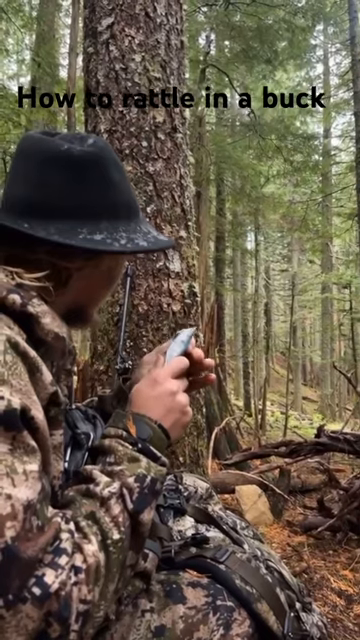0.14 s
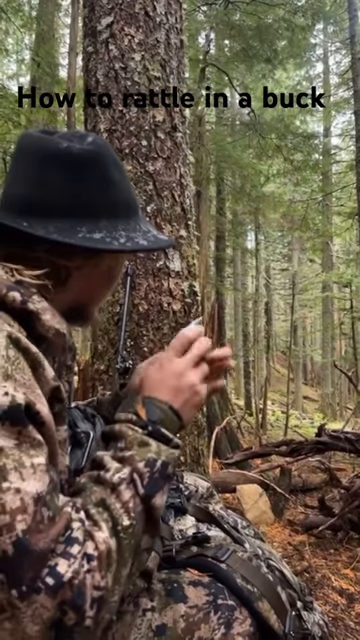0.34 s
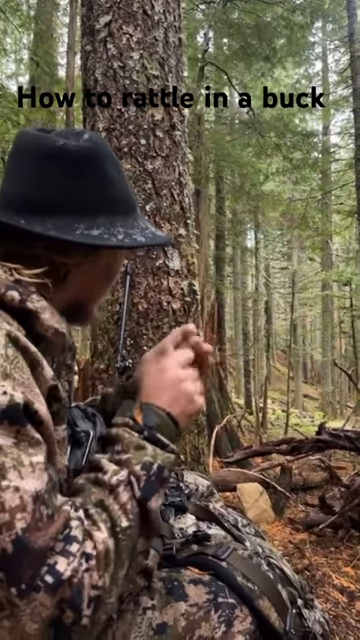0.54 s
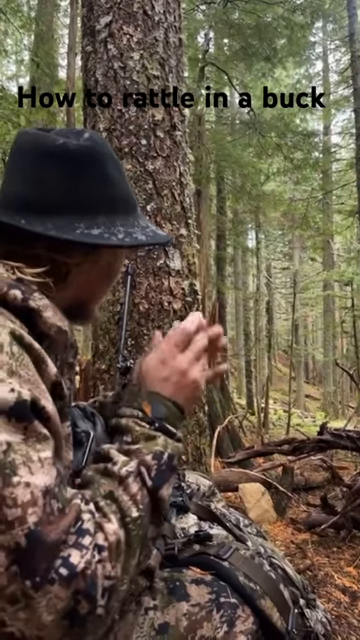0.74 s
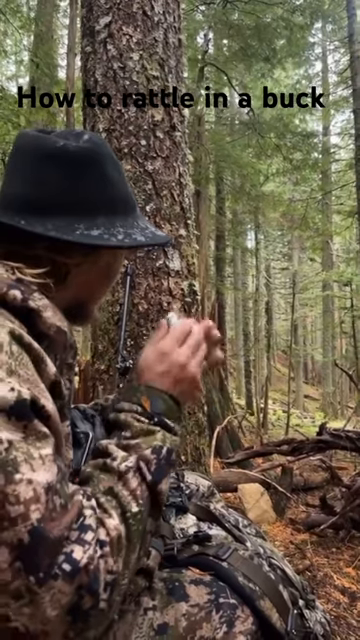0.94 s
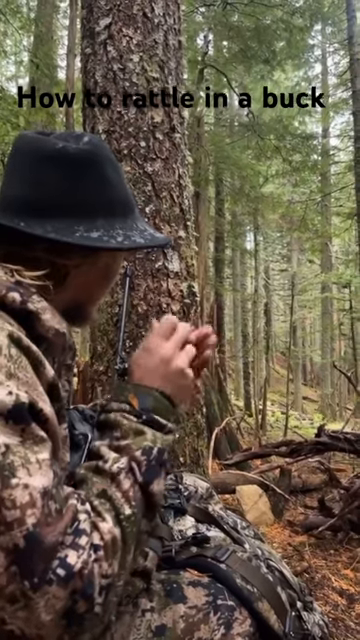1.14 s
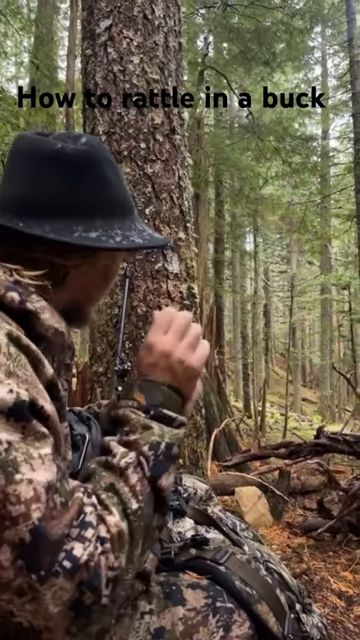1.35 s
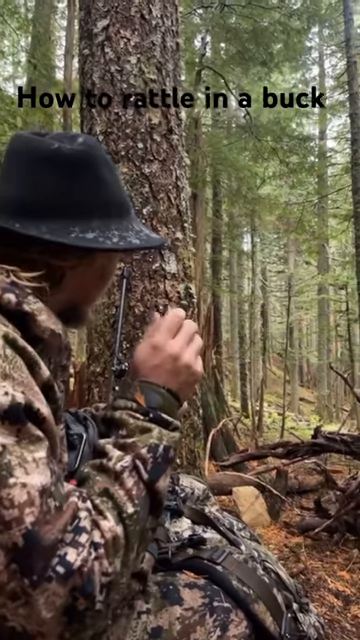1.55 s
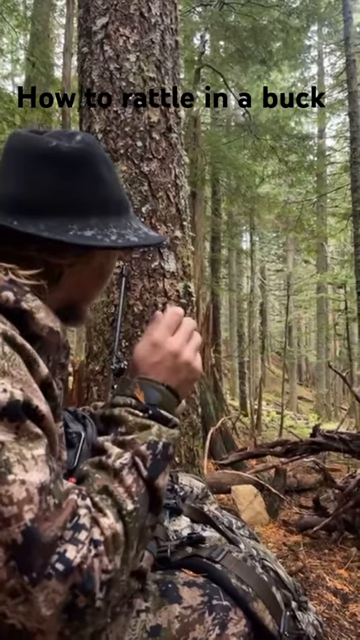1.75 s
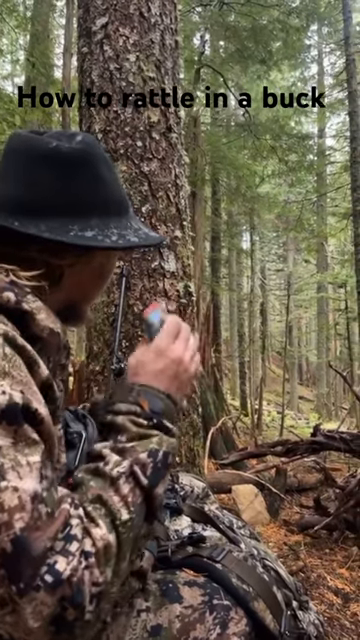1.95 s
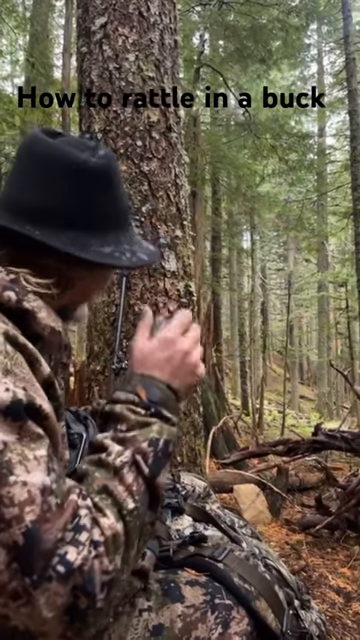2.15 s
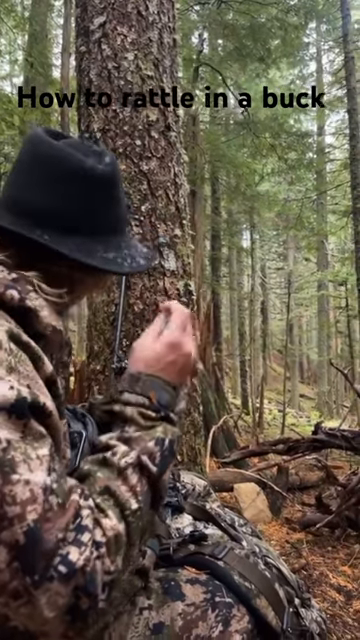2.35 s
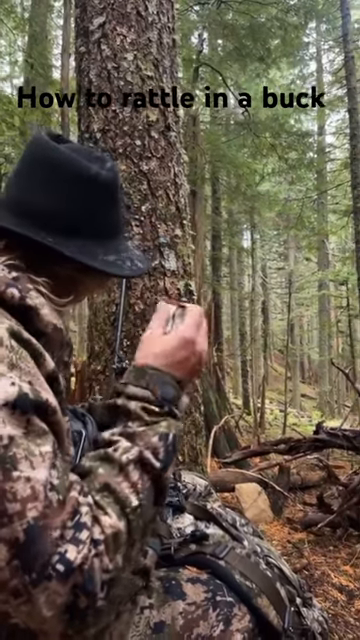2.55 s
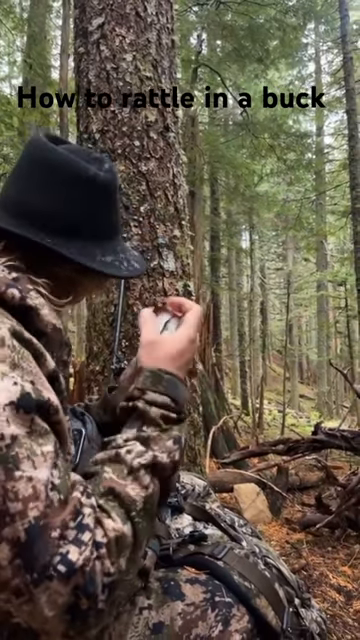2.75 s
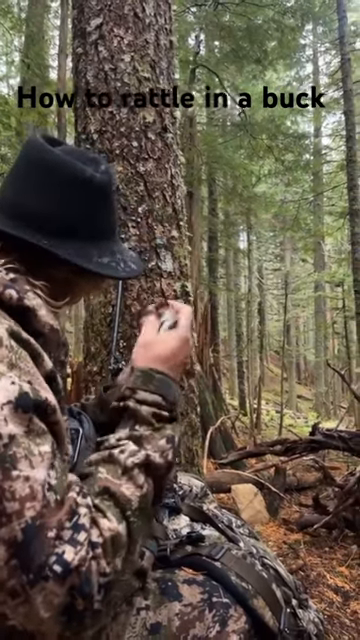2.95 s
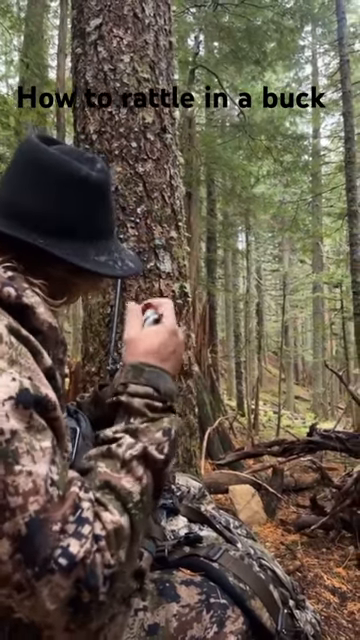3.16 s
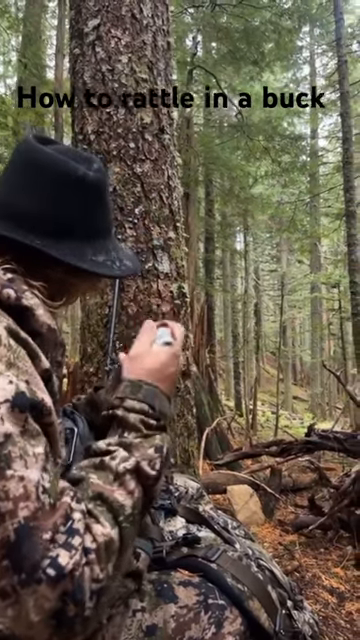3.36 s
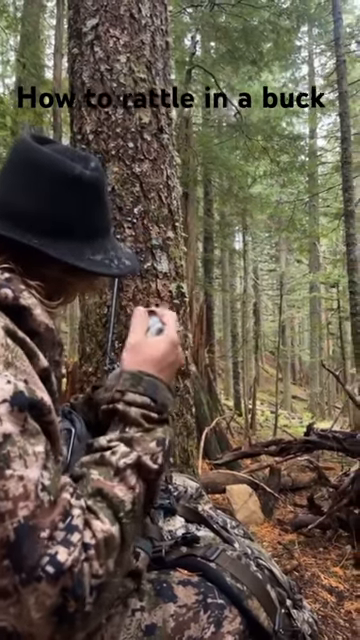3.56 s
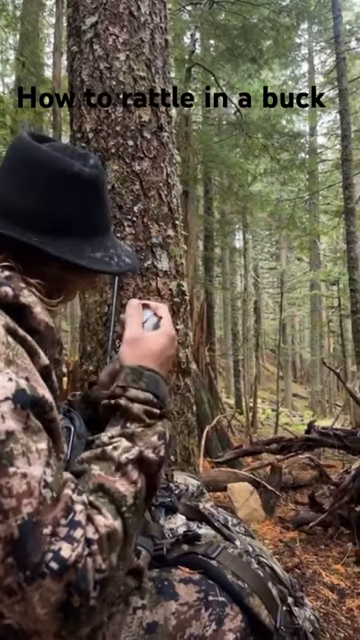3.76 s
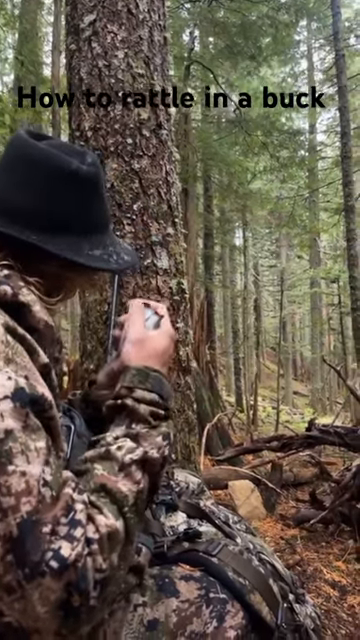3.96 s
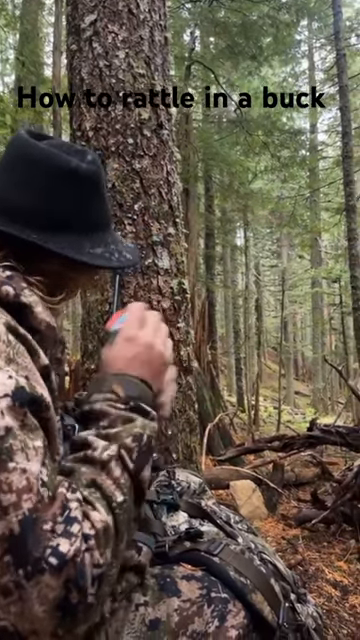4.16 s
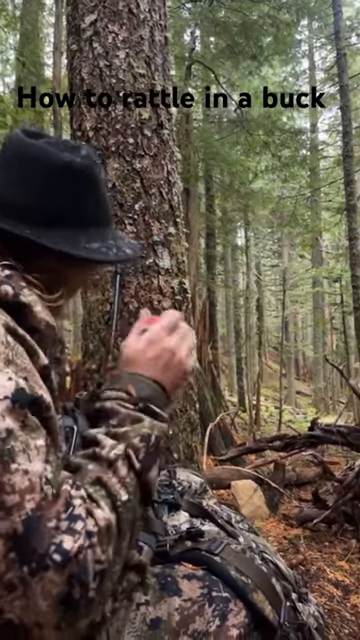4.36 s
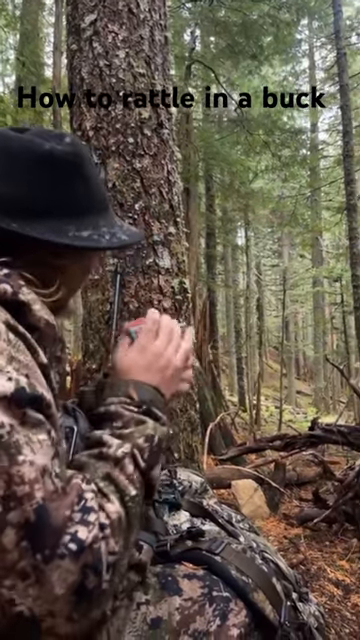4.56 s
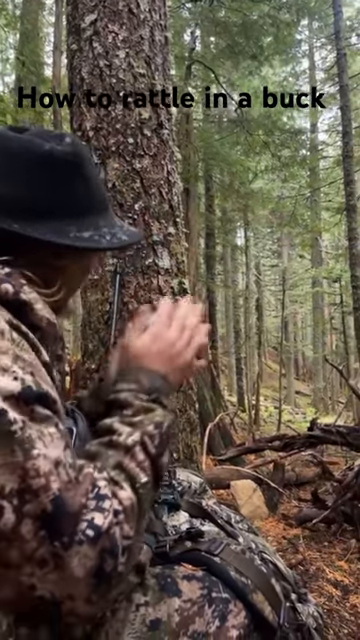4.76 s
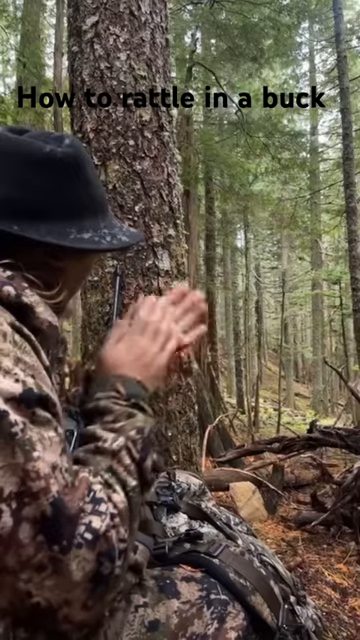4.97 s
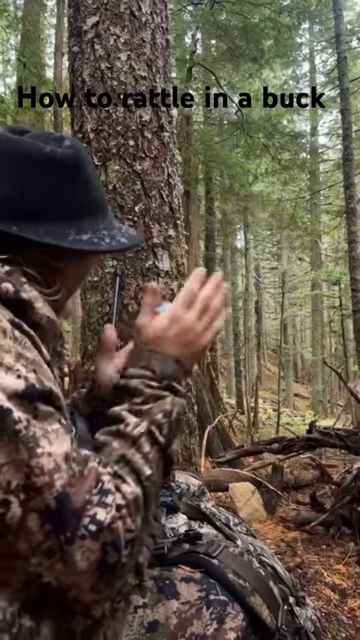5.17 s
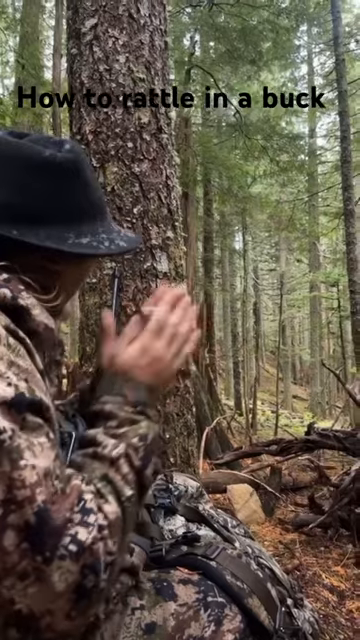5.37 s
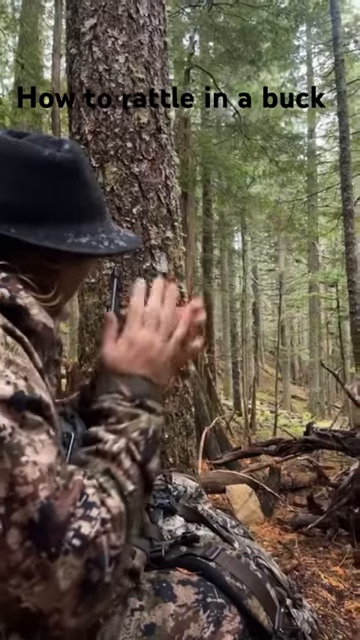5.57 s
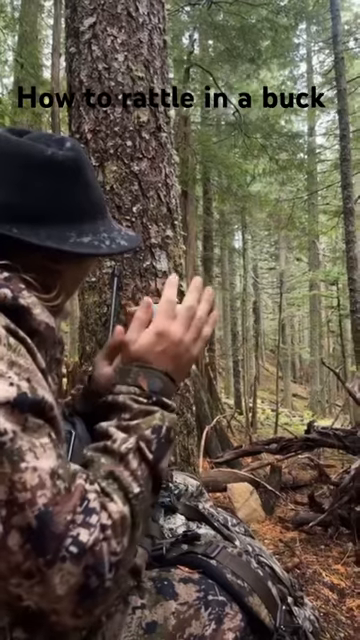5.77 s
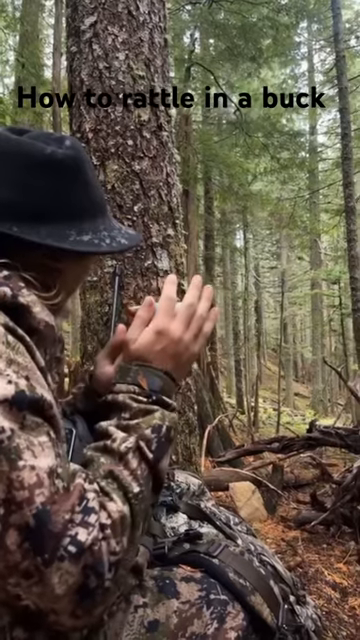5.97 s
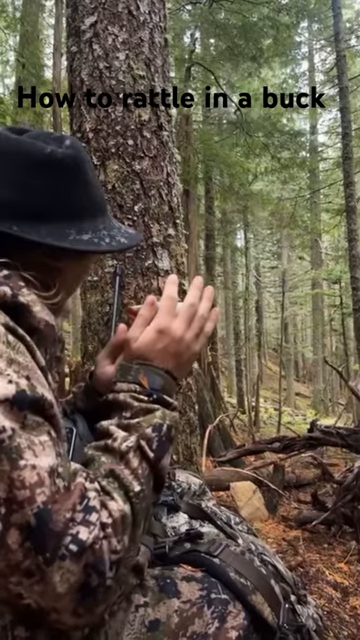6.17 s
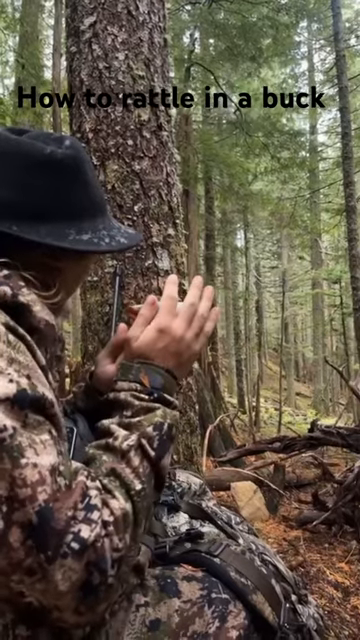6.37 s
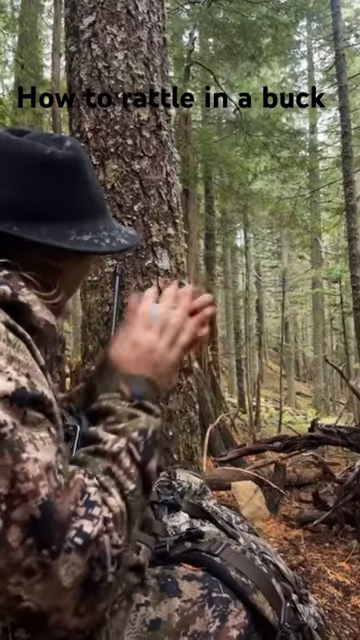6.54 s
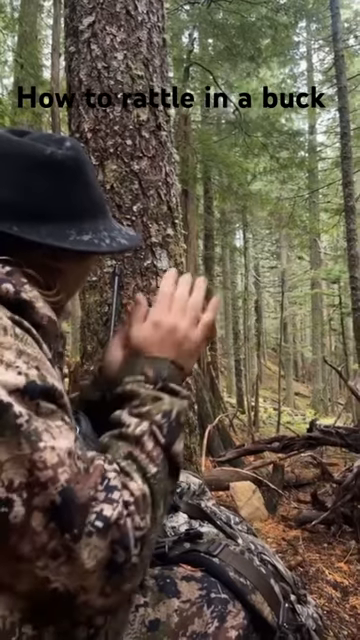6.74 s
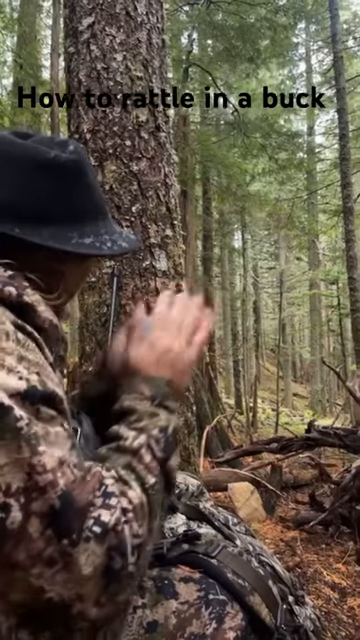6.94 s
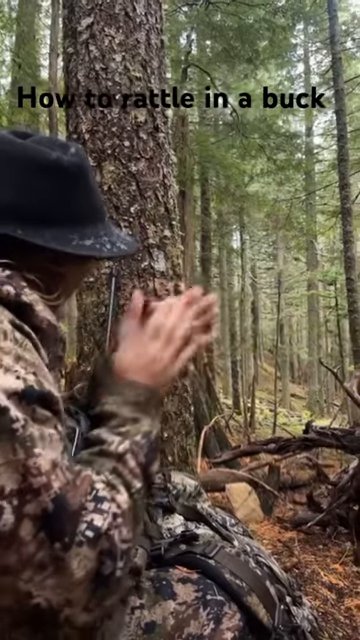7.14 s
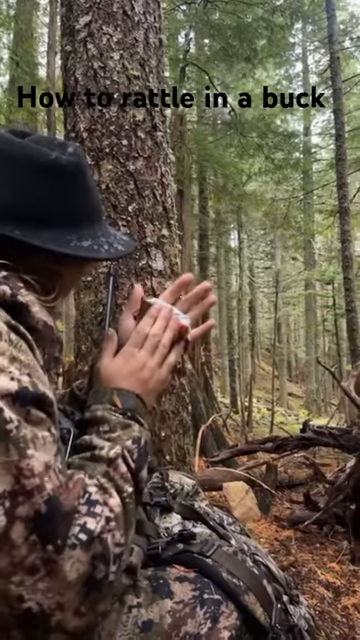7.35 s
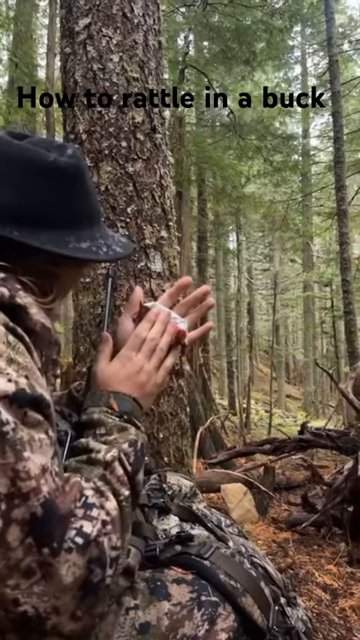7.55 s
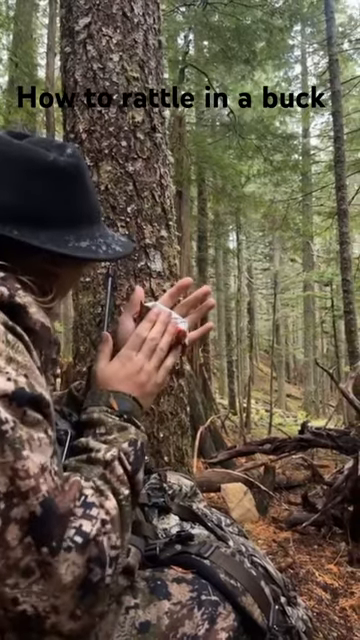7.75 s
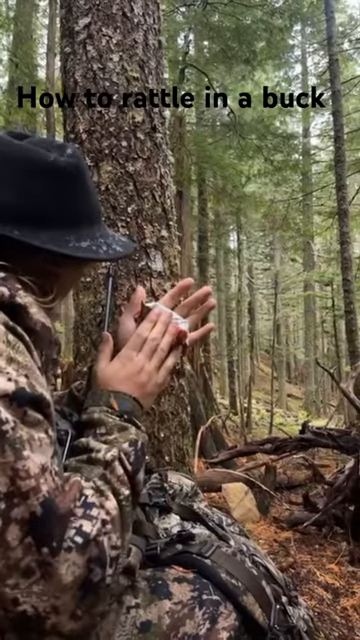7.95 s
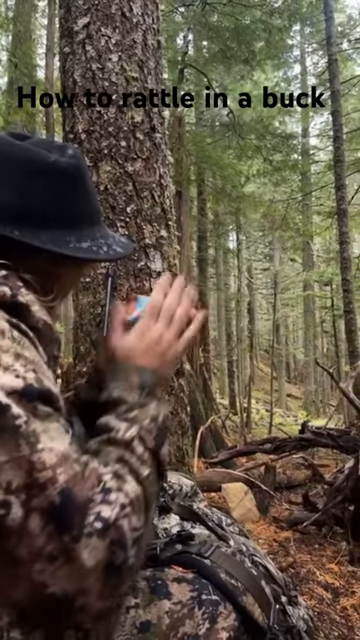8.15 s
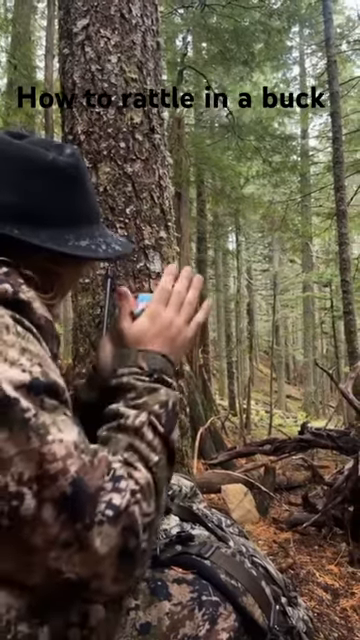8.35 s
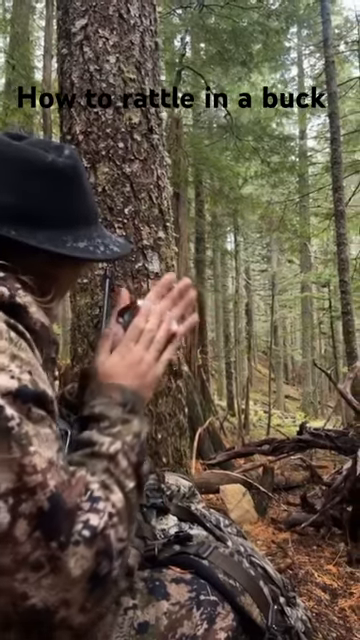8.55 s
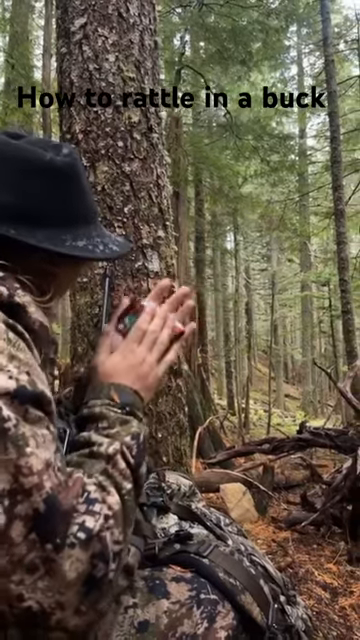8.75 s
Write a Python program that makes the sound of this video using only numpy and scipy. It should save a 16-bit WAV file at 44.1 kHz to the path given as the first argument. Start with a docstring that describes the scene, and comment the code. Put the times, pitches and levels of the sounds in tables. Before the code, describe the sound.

Very close to a phone in a quiet forest, a bundle of hard antler-like sticks is rolled between palms. Dense gritty grinding swells and fades in quick strokes, peppered with dry, sharp clacks and occasional hollow palm knocks and soft low thumps. It thins to ticks, resumes, pauses around four and six seconds, then returns harder. After a lull near seven and a half seconds, a few last strokes. Every ring is damped; almost no echo.

```python
"""Rolling sticks in a forest

A bundle of hard, antler-like sticks is rolled between two palms in a quiet forest, close to a phone.
Dense tiny contacts make the grinding strokes, single contacts the dry clacks; the hands damp every ring.
In the pauses the bundle shifts with faint ticks; it also knocks on the palms with a hollow sound.
Soft thumps are low tones falling in pitch; shaped noise makes the forest hush,
and decaying noise makes the faint scatter that the trunks return."""
import sys
import numpy as np
from scipy import signal
from scipy.fft import rfft, irfft
from scipy.io import wavfile
from scipy.ndimage import uniform_filter1d

SR = 44100
rng = np.random.default_rng(int(sys.argv[2]) if len(sys.argv) > 2 else 0)


def dump_mix(stems):
    """Bounce the given channels to the path in sys.argv[1] as a 16-bit WAV at rate SR."""
    frames = np.atleast_2d(stems).T  # one column per channel
    limited = np.clip(frames, -1, 1)  # hard clip at full scale
    pcm = np.round(limited * 32767).astype(np.int16)
    wavfile.write(sys.argv[1], SR, pcm)


N = 388521
T = np.arange(N) / SR  # time in seconds

# The forest hush, the shape of its spectrum.
# Each row: frequency in Hz, relative level per Hz in dB.
HUSH_SPECTRUM = [(15, -32), (25, -9.5), (53, 2.5), (117, -6), (317, -12.5), (754, -17), (6920, -30.5),
                 (16000, -47)]
HUSH_DB = -61  # average level of the whole hush

# Resonances of the hand-held sticks, before each contact varies them.
# Each row: frequency in Hz, width in Hz, relative height in dB.
STICK_MODES = [(1094, 430, -2), (1724, 200, 0.5), (1640, 380, -1.5), (2700, 790, -5.5), (2852, 560, 3.5),
               (4750, 1200, -6.5), (5380, 780, -6.5), (6983, 260, 3.5), (7560, 450, -4), (8670, 770, -9),
               (15200, 1700, -15)]
# Resonances of the hollow of the cupped hands, before each contact varies them.
# Each row: frequency in Hz, width in Hz, relative height in dB.
HAND_MODES = [(157.7, 53, -24.5), (366, 63, -11), (487, 92, -6.5), (809, 330, -9)]

# Faint ticks as the resting bundle shifts in the grip.
# Each row: start in seconds, level averaged over 3 ms in dB.
SHIFT_TICKS = [(0.0424, -45.5), (0.083, -46), (0.094, -43), (1.5769, -47), (1.761, -52), (1.809, -40),
               (1.818, -47), (3.984, -54), (5.8612, -57), (5.9213, -54.5), (5.9773, -52.5), (6.017, -51),
               (6.1485, -57), (7.431, -49), (8.266, -44.5)]
CONTACT_GAIN = np.sqrt(.003 * SR)  # turns an energy of one into a level of 0 dB over 3 ms
CONTACT_HOLLOW_DB = -21.5  # hands' hollow against the mids in a single contact

# Low thumps that fall in pitch.
# Each row: start in seconds, peak level in dB before the shared trim in thumps(), starting pitch in Hz.
THUMP_FALLS = [(0.049, -35.5, 473), (0.125, -37.5, 410), (0.291, -44, 260), (0.633, -41, 247),
               (0.666, -35.5, 413), (0.941, -40, 270), (1.024, -39, 236), (1.208, -41, 209.5),
               (1.355, -42, 219), (1.418, -37.5, 340), (1.505, -41, 232), (1.553, -47, 172),
               (1.625, -38.5, 315), (3.019, -31.5, 215), (3.318, -41, 271), (5.144, -40, 295),
               (7.26, -28, 302), (7.467, -47, 221), (7.592, -34, 369), (8.511, -24.5, 335)]

# Spells of gentle rolling under the strokes.
# Each row: start in seconds, end in seconds, effort at the start in dB, effort at the end in dB.
ROLLING_SPELLS = [(0.08, 0.177, -52, -40.5), (0.181, 1.138, -36.5, -38), (1.148, 1.52, -33, -40),
                  (1.558, 1.787, -51, -59), (1.84, 2.892, -36.5, -34.5), (2.935, 3.31, -37, -45.5),
                  (3.419, 3.631, -39, -44.5), (3.673, 3.943, -56, -65), (4.056, 5.113, -37.5, -41),
                  (5.187, 5.74, -36.5, -43), (6.452, 7.002, -40.5, -41.5), (7.064, 7.337, -50, -43),
                  (8.054, 8.239, -45, -45), (8.454, 8.675, -38, -38.5)]
GRIP_S, RELEASE_S = 0.0055, 0.02  # time constants as the palms take hold and let go
SETTLE_DB, SETTLE_S = -22, 0.13  # the loosened bundle goes on shifting: relative level, time constant
# lull as the hands turn round: depth, half length, delay after a stroke's peak in its fade times
TURN_DB, TURN_S, TURN_AFTER = -4, 0.019, 1.5

# Strokes of the palms.
# Each row: hardest moment in seconds, effort there in dB, swell in seconds, fade in seconds.
PALM_STROKES = [(0.215, -32, 0.063, 0.063), (0.362, -29.5, 0.045, 0.07), (0.432, -25, 0.027, 0.059),
                (0.592, -22.5, 0.083, 0.037), (0.741, -27, 0.02, 0.098), (0.827, -33, 0.034, 0.05),
                (0.99, -27, 0.12, 0.029), (1.127, -23.5, 0.078, 0.023), (1.904, -28, 0.067, 0.099),
                (1.986, -23.5, 0.012, 0.0079), (2.044, -27.5, 0.021, 0.0072), (2.105, -28.5, 0.024, 0.018),
                (2.253, -36, 0.18, 0.033), (2.439, -32.5, 0.026, 0.047), (2.61, -31, 0.097, 0.025),
                (2.764, -30.5, 0.03, 0.054), (3.193, -34.5, 0.15, 0.033), (3.339, -35.5, 0.027, 0.051),
                (3.518, -29.5, 0.044, 0.028), (4.573, -26, 0.067, 0.086), (4.698, -30.5, 0.042, 0.14),
                (4.857, -23.5, 0.044, 0.06), (5.009, -24, 0.04, 0.11), (5.37, -26.5, 0.084, 0.058),
                (5.549, -21.5, 0.071, 0.042), (6.56, -20.5, 0.059, 0.053), (6.697, -23, 0.07, 0.044),
                (6.825, -22, 0.044, 0.048), (6.934, -19, 0.035, 0.049), (7.123, -20.5, 0.051, 0.075),
                (7.268, -33, 0.025, 0.056), (8.104, -22, 0.029, 0.069), (8.523, -20.5, 0.053, 0.043),
                (8.789, -25.5, 0.052, 0.048)]
STROKE_DROP_DB, STROKE_CURVE = 12.5, 1.6  # fall after one swell or fade time; roundness of the arch

# Brightness of the grinding; only its rise and fall around the average matters.
# Each row: time in seconds, treble over mids in dB.
GRIND_BRIGHTNESS = [(0.2, -3.5), (0.6, 1), (1.5, -8.5), (1.9, -4), (2.3, -6.5), (4.1, -5), (4.55, -10),
                    (4.8, -4.5), (5.05, -4.5), (6.6, -3.5), (8.8, -2.5)]
SPOT_COUNT, TOUCHING_COUNT = 110, 60  # spots on the sticks, and how many can touch at a time
SPOTS_PER_S = 150  # how fast rolling brings new spots

# Single clacks of stick against stick.
# Each row: start in seconds, level over 3 ms in dB, treble over mids in dB, pitch in Hz.
STICK_CLACKS = [(0.155, -27.5, 7, 2827), (0.18, -25, 1, 2880), (0.1934, -20, -8, 3260),
                (0.2092, -20.5, 8.5, 2290), (0.2528, -25.5, 7.5, 1700), (0.282, -25.5, -10, 2600),
                (0.4186, -15.5, -4, 1750), (0.4244, -17.5, 4.5, 2056), (0.501, -24, -18, 2690),
                (0.6179, -20.5, 3.5, 2080), (0.6478, -27.5, -1, 1700), (0.714, -28, 3.5, 1700),
                (0.7386, -19.5, -8, 2990), (0.8021, -24, -21.5, 1800), (0.8296, -14.5, 5, 2130),
                (0.8662, -19, 7, 1910), (0.985, -15.5, 12, 2300), (0.995, -22.5, 10, 2520),
                (1.1974, -26.5, -1, 1910), (1.236, -25, -5, 2320), (1.2909, -25, -15, 1976),
                (1.436, -35, 12, 2500), (1.4785, -37, 10, 2800), (1.6403, -34, 1, 3130),
                (1.6512, -31, 0, 1680), (1.693, -39.5, 8, 2400), (1.841, -31.5, 7.5, 2820),
                (1.8762, -26, -8, 2780), (1.898, -20, 0, 1820), (1.9752, -22, -12, 2500),
                (2.095, -25, 1, 2800), (2.1428, -26.5, -11, 2170), (2.2512, -29.5, -4, 2700),
                (2.477, -22, -4.5, 3460), (2.6002, -19.5, -9, 2900), (2.886, -23.5, 10, 3250),
                (2.9, -25, 10, 3110), (2.974, -26, 0.5, 2000), (3.0298, -27, 12.5, 2780),
                (3.0426, -22.5, -2.5, 2930), (3.148, -32, 13, 2030), (3.202, -25, -5, 2500),
                (3.2209, -28, 0, 2800), (3.2434, -25.5, -3, 2430), (3.3307, -26.5, -22, 1670),
                (3.353, -32.5, 1, 1700), (3.4114, -33.5, 1, 2620), (3.5135, -26, -30, 1690),
                (3.572, -28, -5, 2900), (3.5935, -24.5, -22, 2500), (3.6204, -19.5, -13.5, 2870),
                (3.676, -33.5, 10, 2200), (3.718, -39, 1, 3000), (3.796, -29.5, -15, 2580),
                (3.8096, -30, -6.5, 2000), (3.829, -40.5, 12, 3500), (3.8717, -37.5, -19, 2520),
                (4.0217, -34.5, -6, 2000), (4.0294, -25, 0, 2920), (4.0375, -24.5, -7.5, 2880),
                (4.2396, -26, -6.5, 1580), (4.3775, -25, -23, 1820), (4.4297, -31.5, -24, 1520),
                (4.591, -17.5, -22.5, 1720), (4.6868, -21.5, 10.5, 2730), (4.895, -17.5, -5, 1890),
                (4.968, -25.5, -2.5, 2940), (5.104, -18.5, -15.5, 2750), (5.1235, -30.5, -6.5, 2800),
                (5.309, -19, -3.5, 2820), (5.367, -16, -17.5, 2870), (5.3886, -16, -10.5, 2820),
                (5.578, -17.5, 8.5, 2960), (5.6485, -26.5, -3, 2520), (5.711, -22, 9, 2820),
                (5.7736, -37, 5, 2900), (5.7837, -31, -9, 1650), (6.4582, -29.5, -2.5, 2940),
                (6.483, -27, -4, 2800), (6.5865, -16.5, -13, 2900), (6.6438, -19, -6, 2480),
                (6.656, -14.5, 2, 1800), (6.7112, -18, -11, 2920), (6.8297, -14, -10, 1770),
                (7.0096, -23, 6, 2980), (7.136, -21, -10, 1900), (7.1572, -19.5, -20, 2220),
                (7.2058, -22, -3, 2000), (7.3052, -27, 6, 3000), (7.3309, -27, 3, 2190),
                (8.048, -35, -2, 3120), (8.1159, -15, -2, 2780), (8.251, -34, -4, 2860),
                (8.444, -30.5, -7, 2840), (8.511, -13.5, -28, 2800), (8.5224, -15, -19, 3000),
                (8.5456, -18.5, -17, 1950), (8.5841, -24.5, -12, 2680), (8.677, -25.5, -3.5, 2800),
                (8.6835, -30, -5, 2760), (8.7232, -38, 8.5, 2700)]

# Hollow knocks of the bundle against the palms.
# Each row: start in seconds, peak level in dB.
PALM_KNOCKS = [(0.584, -26.5), (0.986, -28), (1.302, -31.5), (1.481, -34), (1.898, -28), (2.252, -30.5),
               (4.208, -32.5), (5.023, -25.5), (6.078, -49), (8.514, -22.5)]
TOP_HZ = 15950  # upper limit of the phone


def undb(db):
    """Turn decibels into gain."""
    return 10 ** (np.asarray(db) / 20)


def curve(rows):
    """Join rows of time and value by straight lines."""
    return np.interp(T, *np.transpose(rows))


def unit(x):
    """Scale to an energy of one."""
    return x / np.sqrt(np.sum(x ** 2))


def band(x, hz, kind, order=2):
    """Cut above or below a frequency with a Butterworth filter."""
    return signal.sosfilt(signal.butter(order, hz, kind, fs=SR, output="sos"), x)


def add(out, s, x):
    """Mix x into out at time s."""
    i = max(int(s * SR), 0)
    out[i:i + len(x)] += x[:max(N - i, 0)]


def crossover(hz, edge_hz):
    """Low and high response of a steep causal crossover."""
    s = 1j * hz / edge_hz
    low = 1 / (1 + np.sqrt(2) * s + s * s) ** 2
    return low, low * (s * s) ** 2


def hush():
    """Steady low air of the forest: noise shaped to a fixed spectrum."""
    hz, db = np.transpose(HUSH_SPECTRUM)
    bins = np.maximum(np.fft.rfftfreq(N, 1 / SR), 1)
    shape = undb(np.interp(np.log(bins), np.log(hz), db))
    air = irfft(rfft(rng.standard_normal(N)) * shape, N)
    return unit(air) * np.sqrt(N) * undb(HUSH_DB)


def ring(modes, t, detune, scatter_db):
    """Damped resonances; pitch and strength depend on the spot that is touched."""
    hz, width, db = np.transpose(modes)[:, :, None]
    tune, strength, turn = rng.standard_normal((3, len(modes), 1))
    waves = np.sin(2 * np.pi * (hz * (1 + detune * tune) * t + turn))
    waves = waves * np.exp(-np.pi * width * t)  # a wide resonance dies quickly
    return np.sum(undb(db + scatter_db * strength) * width * waves, axis=0)


def contact(treble_db, hollow_db, pitch_hz, focus_db=9, focus_width=0.13, rough=0.65,
            chatter_s=0.00043, bundle=0.15, bundle_s=0.0031, press_s=0.000382,
            split_hz=3900, edge_hz=970, palm_hz=110, snap_hz=3800):
    """One stick hits another: a clean snap, a brief rough push, then a shiver through the bundle."""
    t = np.arange(1024) / SR
    size = 2 * len(t)
    hz = np.maximum(np.fft.rfftfreq(size, 1 / SR), 1)
    press = 1 - np.exp(-(t / press_s) ** 2)
    force = press * (np.exp(-t / chatter_s) + bundle * np.exp(-t / bundle_s))

    # the blunt snap rings the mids; the treble comes mostly from the rough push
    snap = np.exp(-2j * np.pi * hz * press_s) / (1 + (hz / snap_hz) ** 4)
    push = snap + rough * rfft(unit(rng.standard_normal(len(t)) * force), size)

    # thin sticks radiate little below their first mode
    under, over = crossover(hz, edge_hz)
    low, high = crossover(hz, split_hz)
    sticks = push * rfft(ring(STICK_MODES, t, detune=0.057, scatter_db=5.0), size) * over ** 2
    # the hands, ever changing shape, supply the low body
    hands = push * rfft(ring(HAND_MODES, t, detune=0.16, scatter_db=1.5), size)
    hands = hands * under * crossover(hz, palm_hz)[1]

    # the length of the struck stick decides which part of the mids speaks
    off_pitch = (hz / pitch_hz - pitch_hz / hz) / focus_width
    focus = 1 + (undb(focus_db) - 1) / (1 + 1j * off_pitch)
    spectra = (sticks * low * focus, sticks * high, hands)
    mids, treble, hollow = (unit(irfft(part)[:len(t)]) for part in spectra)
    return unit(mids + undb(treble_db) * treble + undb(hollow_db) * hollow)


def shifts(treble_db=-4, pitch_hz=2500):
    """Lone light contacts as the resting bundle shifts, with no rebound."""
    out = np.zeros(N)
    for s, db in SHIFT_TICKS:
        tick = contact(treble_db, CONTACT_HOLLOW_DB, pitch_hz)
        add(out, s, tick * undb(db) * CONTACT_GAIN)
    return out


def thumps(trim_db=-2.5, end_hz=40, fall_s=0.00964, swell_s=0.0053, decay_s=0.014,
           tail=0.094, tail_s=0.042):
    """Soft knocks whose higher part arrives first, so each falls quickly in pitch to a deep tail."""
    out = np.zeros(N)
    t = np.arange(SR // 10) / SR
    swell = 1 - np.exp(-(t / swell_s) ** 3)
    shape = swell * (np.exp(-t / decay_s) + tail * np.exp(-t / tail_s))
    shape = shape / shape.max()
    variations = rng.standard_normal((len(THUMP_FALLS), 2))
    for (s, db, start_hz), (stretch, turn) in zip(THUMP_FALLS, variations):
        fall = np.exp(-t / (fall_s * np.exp(0.039 * stretch)))
        hz = end_hz + (start_hz - end_hz) * fall
        tone = np.sin(2 * np.pi * (np.cumsum(hz) / SR + turn))
        add(out, s, tone * shape * undb(db + trim_db))
    return out


def rolling(t):
    """Power of the gentle rolling: grip, hold, release and settling, with a lull after each stroke."""
    power = np.zeros(len(t))
    for start, end, first_db, last_db in ROLLING_SPELLS:
        before, after = np.maximum(start - t, 0), np.maximum(t - end, 0)
        letting_go = np.exp(-after / RELEASE_S) + undb(SETTLE_DB) * np.exp(-after / SETTLE_S)
        hold = np.exp(-before / GRIP_S) * letting_go
        power += (hold * undb(np.interp(t, [start, end], [first_db, last_db]))) ** 2
    lull = np.zeros(len(t))
    for s, _, _, fade_s in PALM_STROKES:
        lull += np.interp(t - s - TURN_AFTER * fade_s, [-TURN_S, 0, TURN_S], [0, 1, 0])
    return power * undb(TURN_DB * lull) ** 2


def strokes(t):
    """Power of the strokes: each swells to its hardest moment and fades in a rounded arch."""
    power = np.zeros(len(t))
    for s, db, swell_s, fade_s in PALM_STROKES:
        away = np.minimum(np.maximum((s - t) / swell_s, (t - s) / fade_s), 10)
        power += undb(db - STROKE_DROP_DB * away ** STROKE_CURVE) ** 2
    return power


def effort():
    """How hard the sticks are ground together, in dB: rolling and strokes add as powers."""
    t = T[::32]  # a coarse time grid is enough
    power = strokes(t) + rolling(t) + 1e-8
    return np.interp(T, t, 10 * np.log10(power))


def slips(db, rate, spread_db, treble_db, hollow_db, rate_per_db=0.19, even_s=0.033, pitch_hz=2300):
    """Rough surfaces catch and let go in random contacts, whose number and strength follow the effort."""
    # rate is in contacts per second at the median effort; rate_per_db bends it up or down from there
    per_s = rate * np.exp(rate_per_db * (db - np.median(db)))
    hits = (rng.random(N) < per_s / SR) * undb(spread_db * rng.standard_normal(N))

    # the hands feed energy steadily: a big slip leaves less for its neighbours
    span = int(even_s * SR)
    power = uniform_filter1d(uniform_filter1d(hits ** 2, span), span // 2)
    hits = hits / np.sqrt(np.abs(power) + 1e-4) * undb(db)

    # every spot on the sticks has its own hardness, body and pitch
    spots = []
    for hard, body, size in rng.standard_normal((SPOT_COUNT, 3)):
        spot_hz = pitch_hz * np.exp(0.54 * size)
        spots.append(contact(treble_db + 6.9 * hard, hollow_db + 4.1 * body, spot_hz))

    # only some spots touch at a time, and rolling brings new ones, so the colour keeps shifting
    rolled = (SPOTS_PER_S * T).astype(int)
    spot = (rng.integers(TOUCHING_COUNT, size=N) + rolled) % SPOT_COUNT
    side = np.sign(rng.standard_normal(N))  # pushed from either side
    out = np.zeros(N)
    for i in np.flatnonzero(hits):
        add(out, T[i], side[i] * hits[i] * spots[spot[i]])
    return out


def grinding(db, split_hz=3900):
    """A fine scrape and sparser sharp slips follow the hands; the grip dulls or frees the treble."""
    scrape = slips(db - 4.5, rate=2200, spread_db=7.5, treble_db=-1.0, hollow_db=-14, rate_per_db=-0.04)
    ticks = slips(db - 2, rate=250, spread_db=6.5, treble_db=-1.5, hollow_db=-15.0)
    out = scrape + ticks
    # filtering forwards and backwards keeps the mids in step with the treble
    backwards = band(out, split_hz, "low")[::-1]
    mids = band(backwards, split_hz, "low")[::-1]
    bright_db = curve(GRIND_BRIGHTNESS)
    tilt = undb((bright_db - np.mean(bright_db)) / 2)  # half on the treble, half off the mids
    return mids / tilt + (out - mids) * tilt


def clacks(rub_db, chatter_db=2.0, catch_s=0.0016, rebound_s=0.0093, most_db=-10):
    """A stick strikes its neighbour, with a lighter catch before and rebound after that follow the effort."""
    out = np.zeros(N)
    lateness = rng.uniform(.5, 1, len(STICK_CLACKS))  # share of the longest catch and rebound times
    for (s, db, treble_db, pitch_hz), late in zip(STICK_CLACKS, lateness):
        # catch and rebound stay at least 10 dB below the main hit
        light_db = min(np.interp(s, T, rub_db) + chatter_db, db + most_db)
        for lag, part_db in ((-late * catch_s, light_db), (0, db), (late * rebound_s, light_db)):
            hit = contact(treble_db, CONTACT_HOLLOW_DB, pitch_hz)
            add(out, s + lag, hit * undb(part_db) * CONTACT_GAIN)
    return out


def first_grip(x, until_s=1.75, hz=1230, q=7, db=-4):
    """Until the hands take a new hold, the gap between them rings at one more pitch."""
    gap = signal.lfilter(*signal.iirpeak(hz, q, fs=SR), x * (T < until_s))
    return x + undb(db) * gap


def knocks(swell_s=0.0039):
    """The bundle bumps the palms and rings their hollow."""
    out = np.zeros(N)
    t = np.arange(SR // 20) / SR
    swell = 1 - np.exp(-(t / swell_s) ** 2)
    for s, db in PALM_KNOCKS:
        knock = ring(HAND_MODES, t, detune=0.13, scatter_db=2.0) * swell
        add(out, s, knock / np.abs(knock).max() * undb(db))
    return out


def trunks(x, near_db=-18, near_s=0.0043, far_db=-33, far_s=0.032, dull_hz=5000):
    """Quick reflections off body and tree, then a faint dull scatter from the stand, as decaying noise."""
    t = np.arange(SR) / SR
    near, far = rng.standard_normal((2, SR)) * (1 - np.exp(-t / near_s))
    near = undb(near_db) * unit(near * np.exp(-t / near_s))
    far = undb(far_db) * unit(band(far * np.exp(-t / far_s), dull_hz, "low"))
    return signal.fftconvolve(x, near + far)[:N]


def scene():
    """The rattle of the sticks among the trees, with thumps and hush."""
    rub_db = effort()
    gripped = first_grip(clacks(rub_db) + grinding(rub_db))
    rattle = gripped + shifts() + knocks()
    return (rattle + trunks(rattle) + thumps() + hush())[None]


def record(dry):
    """The phone drops the deepest bass and cuts the top."""
    no_bass = band(dry, 37, "high")
    steep_cut = signal.ellip(10, .2, 70, TOP_HZ, fs=SR, output="sos")
    return signal.sosfilt(steep_cut, no_bass)


dry = scene()
out = record(dry)
dump_mix(out)
```